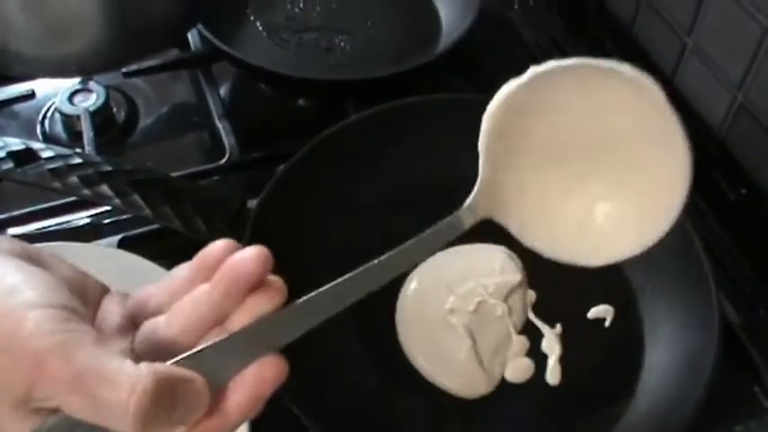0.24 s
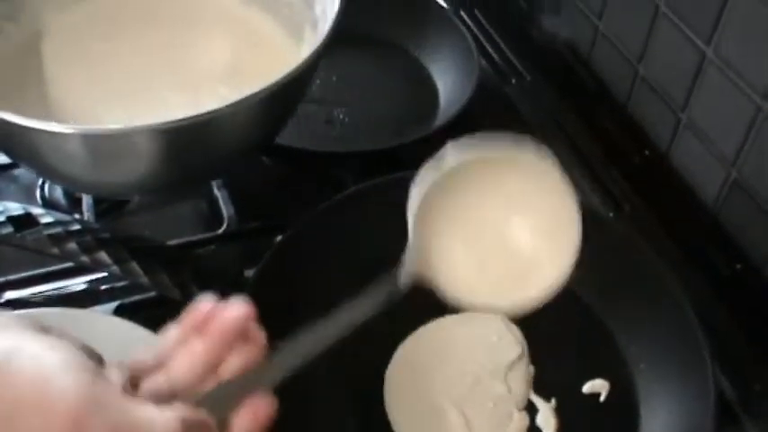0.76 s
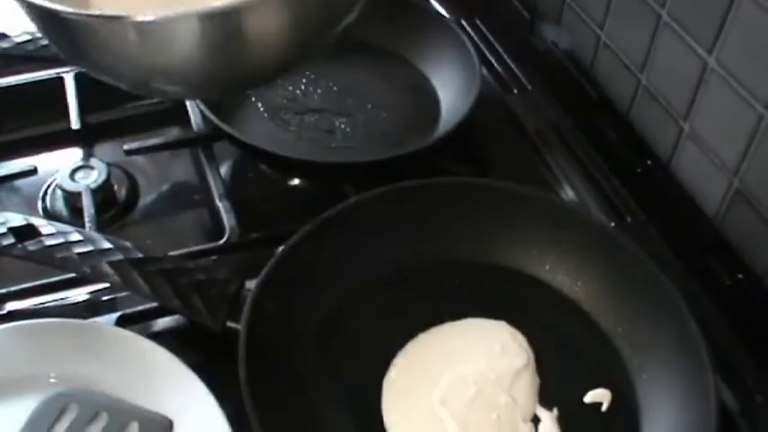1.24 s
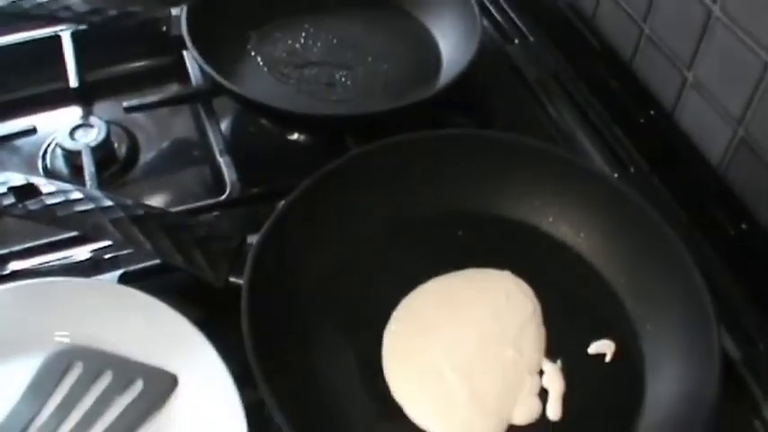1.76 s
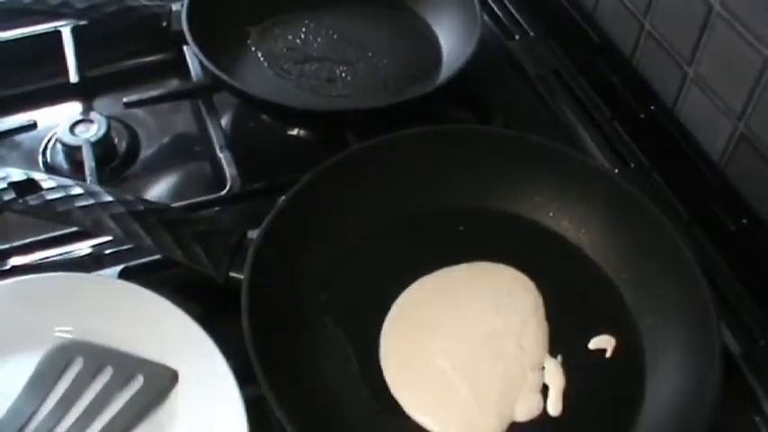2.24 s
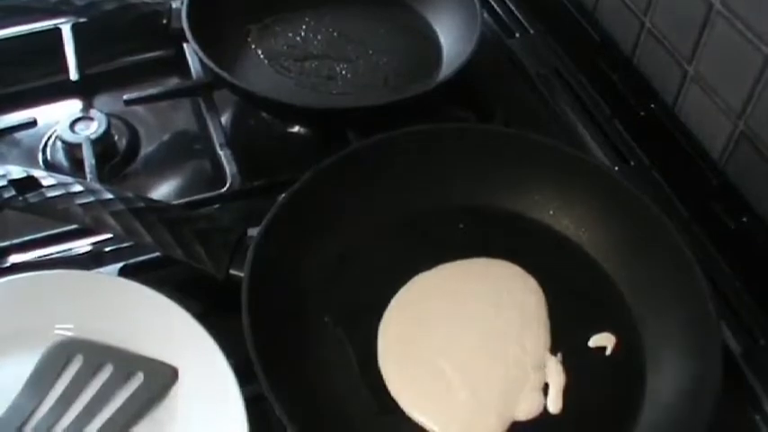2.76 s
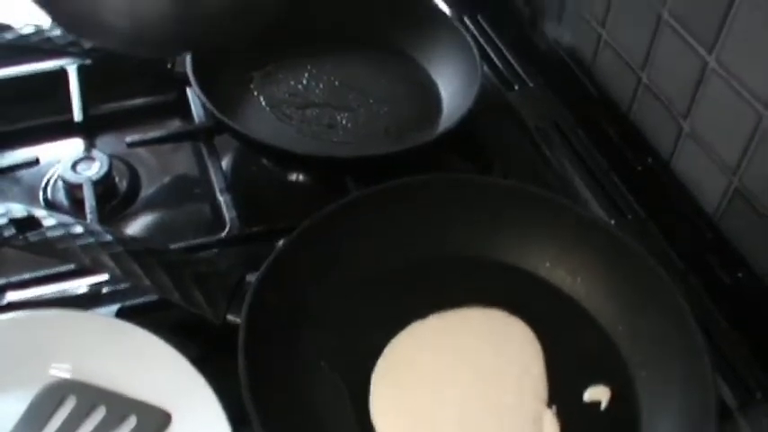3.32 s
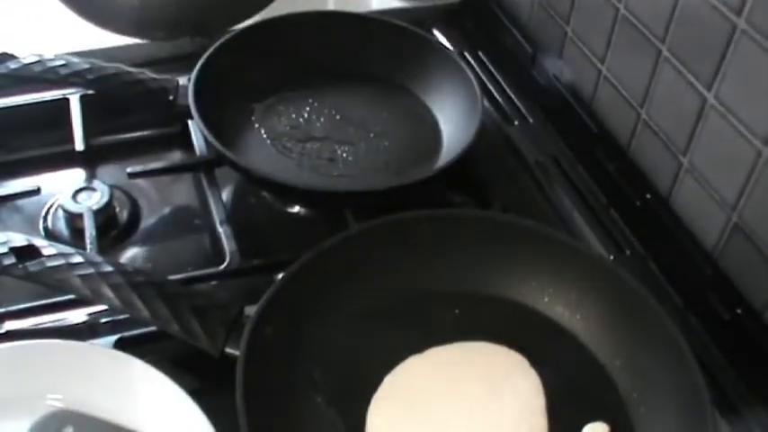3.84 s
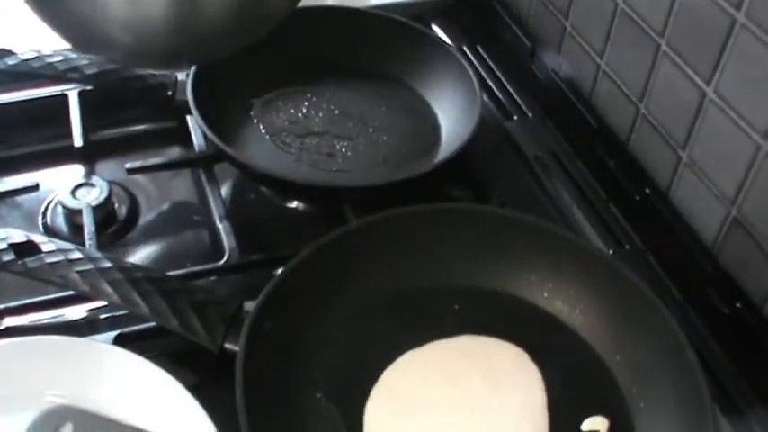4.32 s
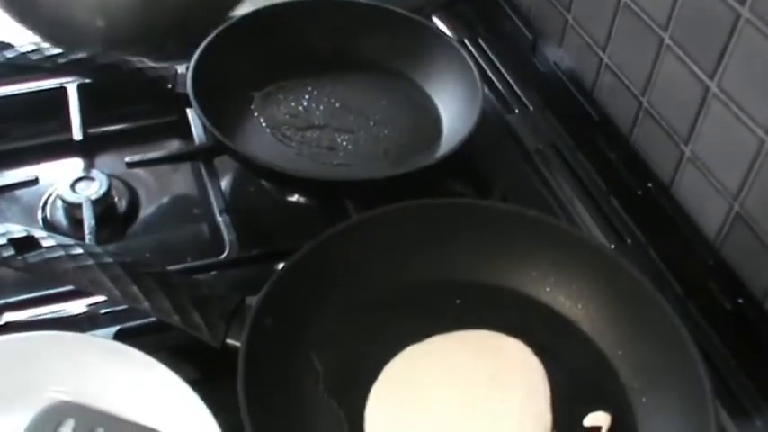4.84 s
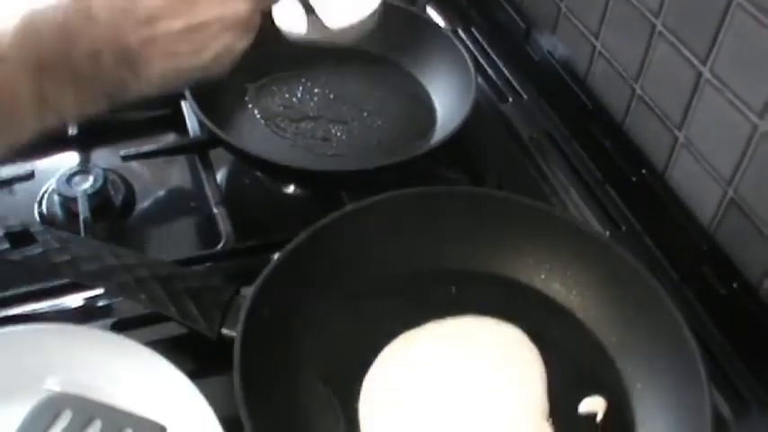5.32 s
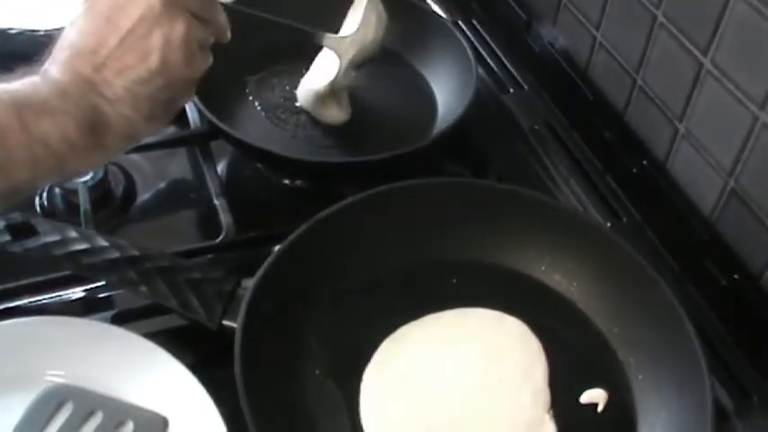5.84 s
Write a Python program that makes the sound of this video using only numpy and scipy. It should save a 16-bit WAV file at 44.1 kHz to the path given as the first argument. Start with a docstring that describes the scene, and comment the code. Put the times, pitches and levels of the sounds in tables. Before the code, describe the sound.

A close, steady frying hiss with snapping oil and gas burners underneath, broken by brief metal bowl clatter and a dull thud.

```python
"""A small kitchen, a stereo pair just above the stove, where pancake batter fries in oiled pans on a gas hob.
Close up and a touch to the right, countless steam bubbles burst in the oil, small spits scatter and a
few snap loudly. The gas flames rush underneath. A touch to the left, a ladle ticks, scrapes and knocks
in the steel batter bowl, one knock sets the bowl sliding, and things bump softly on the worktop."""
import sys
import numpy as np
from scipy import signal
from scipy.fft import rfft, irfft
from scipy.io import wavfile
from scipy.ndimage import uniform_filter1d

SR = 44100
rng = np.random.default_rng(int(sys.argv[2]) if len(sys.argv) > 2 else 0)


def wav_out(sig):
    """Save sig, one row per channel (or a flat mono array), as 16-bit PCM at SR to the path in sys.argv[1]."""
    wavfile.write(sys.argv[1], SR, np.round(np.clip(np.atleast_2d(sig).T, -1, 1) * 32767).astype(np.int16))


N = 268128
T = np.arange(N) / SR
ROOM_T60_S = 0.29

# how hard the pans fry: (time [s], level [dB], finest spray [dB])
FRYING_HEAT = [(0.0, -30.5, -3), (0.38, -34, 1.5), (0.84, -33.5, -2), (2.02, -32, 0), (2.25, -32, 1),
               (3.24, -32, -0.5), (4.09, -33, 1), (4.35, -33.5, 0), (5.7, -32, -2)]
# modes of the steel bowl, damped by batter: (frequency [Hz], t60 [s], struck [dB], rubbed [dB])
BOWL_MODES = [(205, 0.067, -3, -47), (388, 0.33, -14, -31), (437, 0.088, -5, -42), (543, 0.14, -10, -16),
              (690, 0.12, -11, -43), (948, 0.52, -12.5, -17), (1093, 0.34, -8, -14), (1170, 0.18, -3.5, -9),
              (1267, 0.092, -6, -1), (1671, 0.37, -6, -6), (1720, 0.12, 1.5, 1.5), (2147, 0.15, 3.5, -3.5),
              (2210, 0.17, -5, -19), (2555, 0.063, 5, -5), (2775, 0.048, 1, -8.5), (3080, 0.14, 0.5, -11),
              (3304, 0.12, -10, -11), (3470, 0.15, -15, -29), (3650, 0.073, -2, -13.5),
              (5450, 0.27, -10, -13), (6240, 0.012, -16, -5), (6700, 0.018, -16, -7)]
# colour of steel rubbing and striking: (frequency [Hz], gain [dB])
STEEL_COLOUR = [(80, -37), (200, 6), (450, -7.5), (800, -1), (1100, 4), (1700, -9), (2350, -11),
                (2700, -11.5), (3400, 2), (4500, -2), (6500, -18), (8000, -85), (15000, -58)]


def undb(db):
    """Decibels to gain."""
    return 10 ** (np.asarray(db) / 20)


def level(x, db):
    """Scale to an rms level."""
    return x * undb(db) / np.sqrt(np.mean(x ** 2))


def curves(table):
    """The columns of a table of time rows, for every sample."""
    times, *columns = np.transpose(table)
    return [np.interp(T, times, column) for column in columns]


def fade(t60, size=16384):
    """Exponential decay, 60 dB down after t60 seconds."""
    return np.exp(-np.log(1000) * T[:size] / t60)


def add(out, s, x):
    """Mix x into out, starting at s seconds."""
    i = int(s * SR)
    out[..., i:i + x.shape[-1]] += x[..., :N - i]


def convolve(x, response):
    """Pass a sound through a response, keeping its length."""
    return signal.fftconvolve(np.atleast_2d(x), np.atleast_2d(response), axes=-1)[:, :x.shape[-1]]


def colour(x, points, size=4096):
    """Causal filter with the spectrum of (frequency [Hz], gain [dB]) points."""
    hz, db = np.transpose(points)
    bins_hz = np.fft.rfftfreq(size, 1 / SR)
    gain = undb(np.interp(np.log(bins_hz + 1), np.log(hz), db))
    # folding the cepstrum gives minimum phase
    cepstrum = irfft(np.log(gain))
    cepstrum[1:size // 2] *= 2
    cepstrum[size // 2 + 1:] = 0
    return convolve(x, irfft(np.exp(rfft(cepstrum))))


def band(x, hz, width):
    """One resonance, gain 1 at its centre."""
    return signal.lfilter(*signal.iirpeak(hz, hz / width, fs=SR), x)


def low_cut(x, hz, order=2):
    """Roll off the bass below hz."""
    return signal.sosfilt(signal.butter(order, hz, "high", fs=SR, output="sos"), x)


def walk(rate):
    """Random drift with an rms of 1, taking rate steps a second."""
    hold = int(SR / rate)
    steps = np.repeat(rng.standard_normal(N // hold + 1), hold)
    return level(uniform_filter1d(uniform_filter1d(steps, hold), hold)[:N], 0)


def clicks(rate, spread_db):
    """Clicks at random moments: many small ones, a few large."""
    fires = rng.random(N) < rate / SR
    return fires * undb(spread_db * rng.standard_normal(N)) * rng.choice([-1, 1], N)


def mic_path(near_db, near_t60, room_db, size=16384):
    """From one spot to both microphones: direct sound, scatter off pan and tiles, then the kitchen."""
    near = level(fade(near_t60, size) * (T[:size] > .0002), near_db)
    room = level(fade(ROOM_T60_S, size) * (T[:size] > .004), room_db)
    mid, side = rng.standard_normal((2, size)) * np.hypot(near, room) / np.sqrt(2 * size)
    side = low_cut(side, 350, order=1)  # long waves reach both microphones alike
    path = np.array([mid + side, mid - side])
    path[:, 0] += 1  # direct sound
    return path / np.sqrt(np.sum(path ** 2) / 2)


def pan(x, db):
    """Place a sound by its left-minus-right level."""
    return x * undb(np.array([[db], [-db]]) / 2)


def sizzle(spots=8):
    """Tiny steam bubbles burst at spots around the batter; each spot flares and calms on its own."""
    # colour of the bursting bubbles: (frequency [Hz], gain [dB])
    fizz_colour = [(300, -15), (1200, -12.5), (2700, -14), (4000, -8), (4550, -9.5), (5400, -5),
                   (6300, -8.5), (7300, -2.5), (8500, -1.5), (10400, 0.5), (12000, -0.5), (14000, -5),
                   (16000, -10)]
    heat_db, spray_db = curves(FRYING_HEAT)
    out = 0
    for _ in range(spots):
        fine = clicks(rate=1400, spread_db=2.5) * undb(1.97 * walk(18))
        # larger bubbles crackle, each spot with a pitch of its own
        hz = rng.uniform(4200, 15500)
        crackle = undb(18) * band(clicks(rate=12, spread_db=4), hz, 0.29 * hz)
        out = out + convolve(fine + crackle, mic_path(near_db=-5.5, near_t60=0.029, room_db=-16))
    ring = undb(-2.5) * band(out, hz=7650, width=130)
    out = colour(out + ring, fizz_colour)
    # the finest spray comes and goes on its own
    spray = signal.sosfiltfilt(signal.butter(2, 11500, "high", fs=SR, output="sos"), out)
    out = out + spray * (undb(spray_db + 1.03 * walk(8.3)) - 1)
    return level(out, 1) * undb(heat_db)


def burners():
    """Gas flames rush and sing in the burners' resonances, nearly alike at both microphones."""
    # rush of the flames: (frequency [Hz], gain [dB])
    flame_colour = [(20, -32), (40, -3), (70, -2), (170, -6), (300, -1), (900, -4), (1200, -11),
                    (1500, -3.5), (2600, -4), (6000, -15.5)]
    # resonances of the burners: (frequency [Hz], width [Hz], level [dB])
    resonances = [(131, 102, -62), (533, 165, -63), (629, 113, -58), (730, 63, -62.5), (1859, 260, -56.5),
                  (2054, 200, -51.5)]
    gas = rng.standard_normal(N) + undb(-13) * rng.standard_normal((2, N))
    out = level(colour(gas, flame_colour), -49.5)
    for hz, width, db in resonances:
        singing = band(band(gas, hz, width), hz, width)
        out += level(singing, db) * undb(1.1 * walk(14))
    return out


def spit(db, hz, pop_db, size=2048):
    """A larger bubble snaps in about one cycle over its cavity's lower pop; the pan wall echoes it."""
    # colour of a spit: (frequency [Hz], gain [dB])
    snap_colour = [(200, -14), (1500, 6), (2500, 0), (4000, 2), (7000, 4), (10000, 6.5), (14000, 5),
                   (16000, 3)]
    burst = signal.unit_impulse(size)
    pop = undb(pop_db) * band(burst, 0.5 * hz, 0.27 * hz)
    snap = colour(band(burst, hz, 0.59 * hz) + pop, snap_colour, size)
    snap = snap / np.abs(snap).max()
    wall_lag = int(rng.uniform(.0002, .0009) * SR)
    snap = snap + undb(-8) * np.roll(snap, wall_lag)
    path = mic_path(near_db=-3.5, near_t60=0.053, room_db=-10.5, size=8192)
    return convolve(path, snap) * undb(db + 2.5)


def spatter():
    """Lesser spits of random size and pitch, crowding together where the frying is hardest."""
    mean_per_s, doubling_db = 9, 2  # the rate doubles with each such rise in the frying level
    typical_db, spread_db = -13.5, 1.6
    typical_hz, spread_octaves = 10900, 0.24
    sets_at_s, calming_db_per_s = 3.8, 2  # the spits weaken as the batter sets
    heat_db, _ = curves(FRYING_HEAT)
    activity = np.cumsum(2 ** (heat_db / doubling_db))
    out = np.zeros((2, N))
    for _ in range(int(mean_per_s * N / SR)):
        s = np.interp(rng.random() * activity[-1], activity, T)
        strength, pitch = np.clip(rng.standard_normal(2), -2, 2)
        db = typical_db + spread_db * strength - calming_db_per_s * max(s - sets_at_s, 0)
        hz = typical_hz * 2 ** (spread_octaves * pitch)
        add(out, s, spit(db, hz, pop_db=-19))
    return out


def ladle_tick():
    """The ladle makes one brief, dead metallic contact."""
    # the light touch: (time [s], peak at the source [dB])
    touches = [(.3777, -10.5)]
    # its colour: (frequency [Hz], gain [dB])
    tick_colour = [(300, -20), (1000, 0), (2300, 2), (3300, 10), (8000, 0), (12000, 2.5), (15000, -21)]
    out = np.zeros((1, N))
    for s, db in touches:
        tick = colour(rng.standard_normal(16384) * fade(t60=0.016), tick_colour)
        add(out, s, tick / np.abs(tick).max() * undb(db))
    return convolve(out, mic_path(near_db=-9, near_t60=.02, room_db=-12))


def loud_spits():
    """The few spits of oil that stand out from the sizzle, right under the microphones."""
    # (time [s], relative level [dB], pitch [Hz], gain of the low pop [dB])
    snaps = [(0.5426, -4, 9900, -28), (0.6675, -7.5, 9170, -7), (0.6951, -4, 9800, -11),
             (0.968, -4.5, 10700, -19), (1.1308, -13.5, 7800, -12), (1.2361, -11, 9540, -4),
             (1.351, -8, 12000, -16), (1.4642, -9, 10400, -6), (1.5634, -1.5, 9540, -4.5),
             (1.5876, -8, 7280, -9), (1.922, -12.5, 8290, -10), (2.1731, -5.5, 10300, -7),
             (2.2788, -6, 12900, -9), (3.2192, -8, 11300, -4), (3.3144, -2, 10100, -5),
             (3.515, -4.5, 8260, -24), (4.1016, -5.5, 11300, -16), (4.1338, -4.5, 10300, -17),
             (4.232, -10.5, 8900, -20), (4.4297, -7, 9460, -23), (4.538, -8, 11800, -18)]
    out = np.zeros((2, N))
    for s, db, hz, pop_db in snaps:
        add(out, s, spit(db, hz, pop_db))
    return out


def worktop_bumps():
    """Dull thuds in the worktop; lighter things excite its higher modes."""
    # thuds: (time [s], level [dB], tilt [dB per octave])
    thuds = [(1.356, -49, 8), (1.381, -56, 9), (1.393, -47.5, 7), (3.861, -55, 14), (4.629, -44, 6.5),
             (4.64, -60, 13.5), (5.416, -25, -3), (5.4213, -30, 4.5), (5.464, -40.5, 4.5)]
    # modes of the worktop: (frequency [Hz], t60 [s], gain [dB])
    modes = [(124, 0.2, 5), (212, 0.1, -7), (251, 0.073, -5.5), (344, 0.066, -1.5), (468, 0.032, -8),
             (810, 0.019, -11), (1084, 0.074, -21.5), (1240, 0.011, -13.5)]
    lowest_hz = modes[0][0]
    out = np.zeros(N)
    for s, db, tilt_db in thuds:
        for k, (hz, t60, mode_db) in enumerate(modes):
            gain = undb(db + mode_db + tilt_db * np.log2(hz / lowest_hz))
            # neighbouring modes push the air in opposite directions
            add(out, s, (-1) ** k * gain * fade(t60) * np.sin(2 * np.pi * hz * T[:16384]))
    out = low_cut(out, 75)  # a board radiates little below its lowest mode
    return convolve(out, mic_path(near_db=-12, near_t60=.03, room_db=-13))


def scrape_pressure(start_s, end_s):
    """The ladle bears on, drags and lifts off, with a brief swell wherever it catches."""
    # the ladle catches and rasps harder: (time [s], extra level [dB])
    catches = [(2.414, 9), (2.45, 1.5), (2.57, 5)]
    hold_db, attack_db_per_s, release_db_per_s, catch_s = -32, 330, 270, 0.015
    attack_db = attack_db_per_s * np.maximum(start_s - T, 0)
    release_db = release_db_per_s * np.maximum(T - end_s, 0)
    catch_db = sum(extra_db * np.exp(-((T - s) / catch_s) ** 2) for s, extra_db in catches)
    return undb(hold_db - attack_db - release_db + catch_db)


def ladle_scrape():
    """Steel sticks and slips on steel, ringing the bowl and locking into a squeal at its liveliest mode."""
    start_s, end_s, damping_hz = 2.392, 2.606, 45
    squeal_hz, sag_hz_per_s = 1724, 330  # the squeal sinks as the stroke goes on
    slips = clicks(rate=1400, spread_db=3) * undb(2 * walk(130))
    ring = 0
    for hz, t60, _, rubbed_db in BOWL_MODES:
        width = damping_hz + 5 / t60
        ring = ring + level(band(band(slips, hz, width), hz, width), rubbed_db)
    dragged_s = np.clip(T, start_s, end_s) - start_s
    pitch = (squeal_hz - sag_hz_per_s * dragged_s) * (1 + 0.013 * walk(110))
    squeal = np.sin(2 * np.pi * np.cumsum(pitch) / SR) * undb(4.6 * walk(120))
    rub = level(ring, -1.4) + level(colour(slips, STEEL_COLOUR), -16.5)
    stroke = (rub + level(squeal, -3)) * scrape_pressure(start_s, end_s)
    return convolve(stroke, mic_path(near_db=-14, near_t60=.02, room_db=-12))


def ladle_knocks():
    """Each blow gives a short clack and rings the bowl; a longer contact is duller."""
    # ladle against the bowl: (time [s], level [dB], contact time [s])
    blows = [(2.41, -55, .0004), (3.860, -14, 0.000051), (3.8655, -33, 0.00036), (3.887, -16.5, 0.00032),
             (3.921, -23.5, 0.00013)]
    out = np.zeros((1, N))
    for s, db, contact_s in blows:
        ring = sum(undb(struck_db) * fade(t60) * np.sin(2 * np.pi * (hz * T[:16384] + rng.random()))
                   for hz, t60, struck_db, _ in BOWL_MODES)
        clack = level(colour(rng.standard_normal(16384), STEEL_COLOUR), -10) * fade(t60=0.066)
        push = np.exp(-T[:256] / contact_s * 2)
        add(out, s, undb(db) * convolve(undb(-8) * ring + clack, push / push.sum()))
    out = low_cut(out, 130)  # the bowl is too small to radiate deep bass
    return convolve(out, mic_path(near_db=-10.5, near_t60=0.015, room_db=-8.5))


def bowl_slide():
    """The knocked bowl slides grittily, gripping harder and losing its treble as it comes to rest."""
    # colour of the sliding bowl: (frequency [Hz], gain [dB])
    grit_colour = [(80, -38), (300, -9.5), (550, -10), (820, -11.5), (1050, 0), (1700, -4), (2150, 1.5),
                   (2380, -17), (2600, -2), (3050, -8), (3700, -13), (5000, -11.5), (6400, -7.5),
                   (9000, -28)]
    start_s, stop_s, brake_s = 3.862, 4.038, 0.047
    slide_db, grip_db, release_db_per_s = -31, 4, 330
    jolt_db, jolt_s = 12.5, 0.014  # extra pressure just after the knock
    age = np.maximum(T - start_s, 0)
    speed = np.clip((stop_s - T) / brake_s, 0, 1)
    db = slide_db + jolt_db * np.exp(-age / jolt_s) + grip_db * (1 - speed)
    db -= release_db_per_s * np.maximum(T - stop_s, 0)
    grit = level(colour(clicks(rate=2500, spread_db=3), grit_colour), 0)
    dull = signal.sosfiltfilt(signal.butter(2, 1900, fs=SR, output="sos"), grit)
    slide = (dull + speed * (grit - dull)) * undb(db) * (age > 0)
    return convolve(slide, mic_path(near_db=-20, near_t60=0.068, room_db=-6))


def scene():
    """From above the stove: pans just right of centre, burners and bowl just left."""
    flames = burners()
    handling = ladle_knocks() + ladle_scrape() + bowl_slide() + worktop_bumps() + ladle_tick()
    frying = sizzle() + loud_spits() + spatter()
    return pan(frying, db=-.85) + pan(flames, db=0.8) + pan(handling, db=1.1)


def record(dry):
    """The microphones thin the deep bass, and the top is cut steeply."""
    bass_hz, top_hz = 42, 15850
    top_cut = signal.ellip(10, .1, 80, top_hz, fs=SR, output="sos")
    return signal.sosfilt(top_cut, low_cut(dry, bass_hz))


dry = scene()
out = record(dry)
wav_out(out)
```